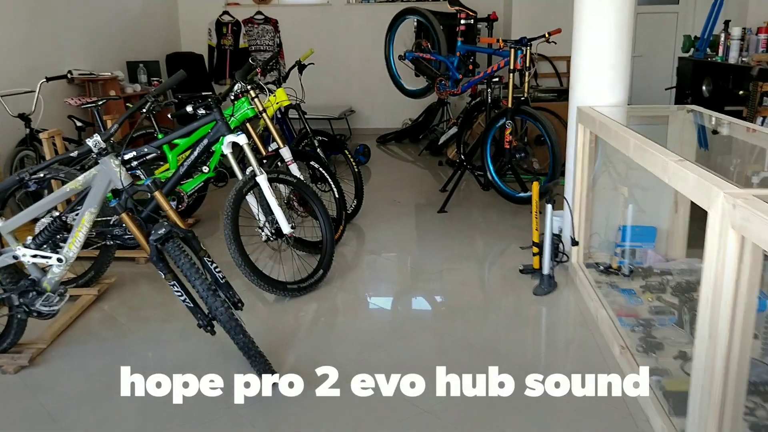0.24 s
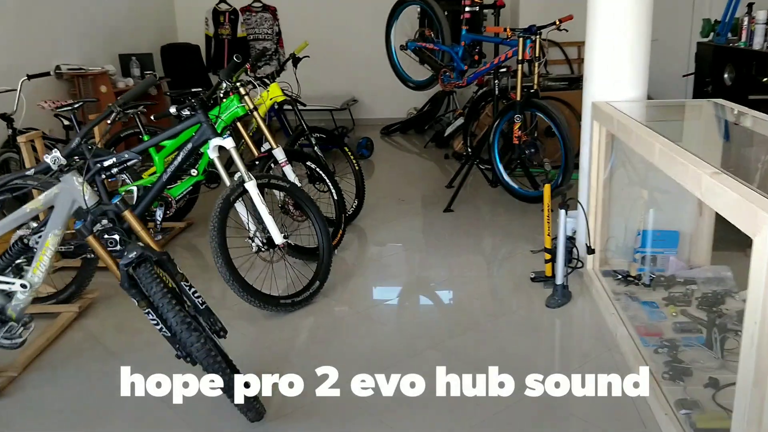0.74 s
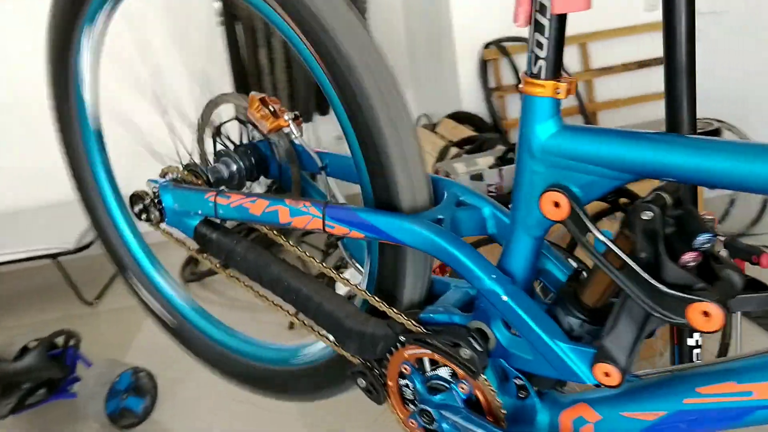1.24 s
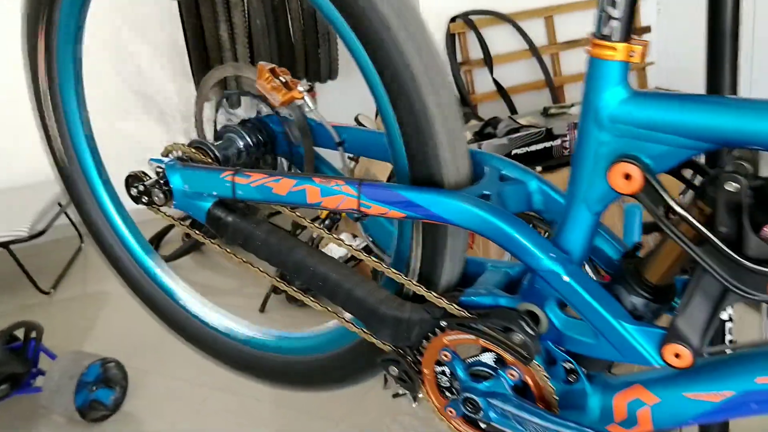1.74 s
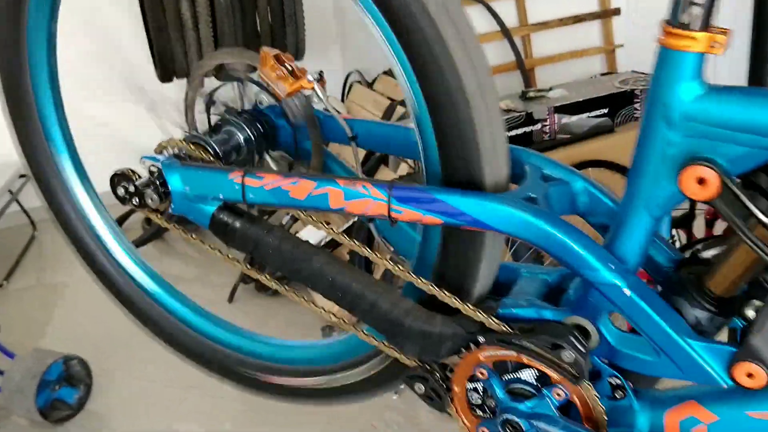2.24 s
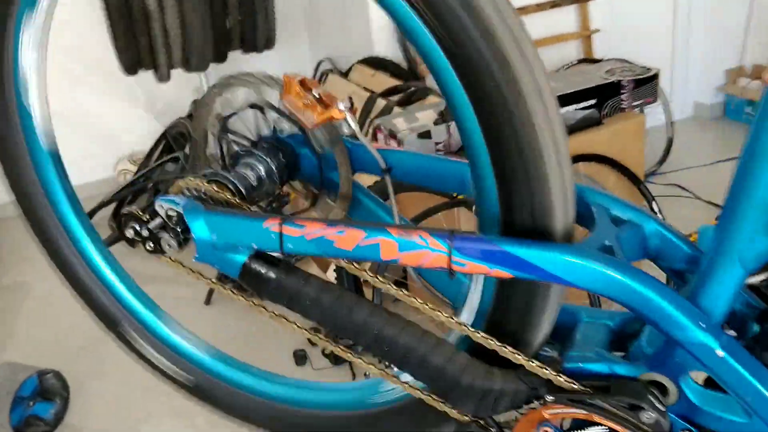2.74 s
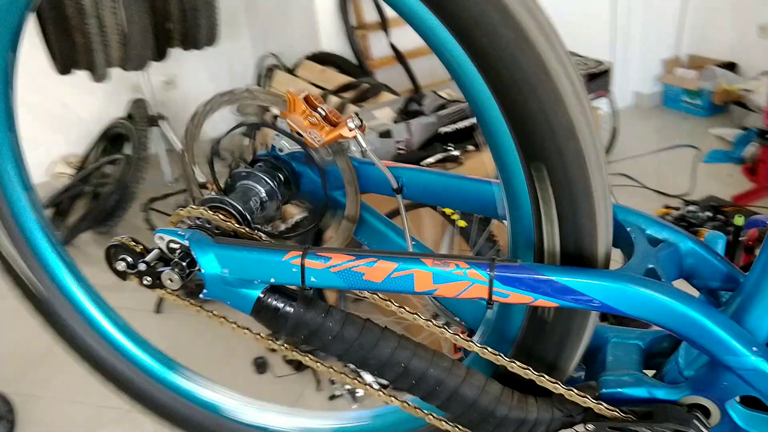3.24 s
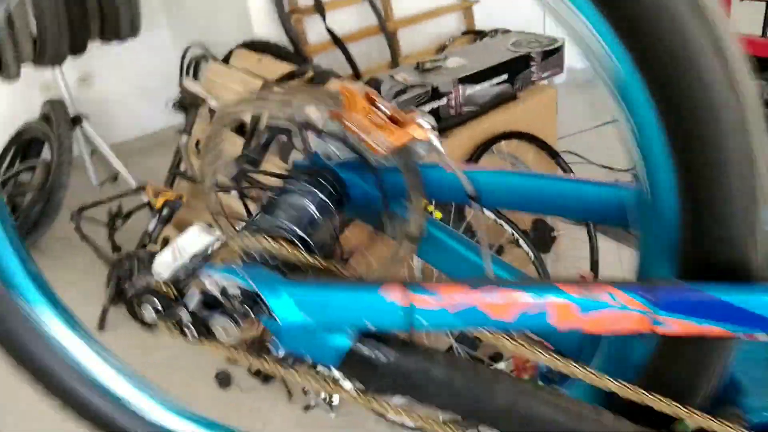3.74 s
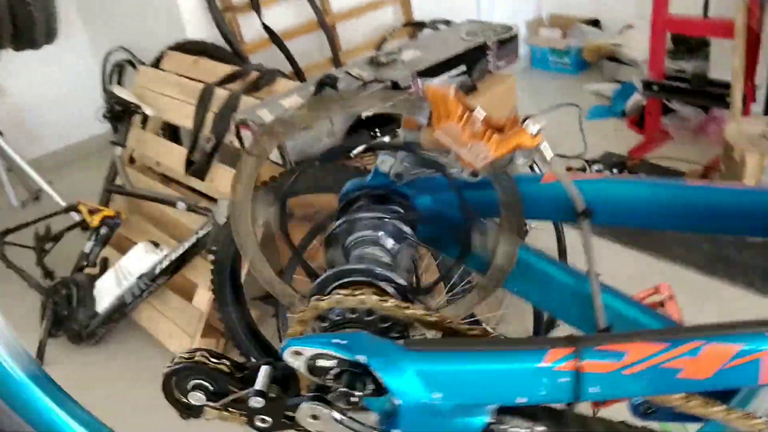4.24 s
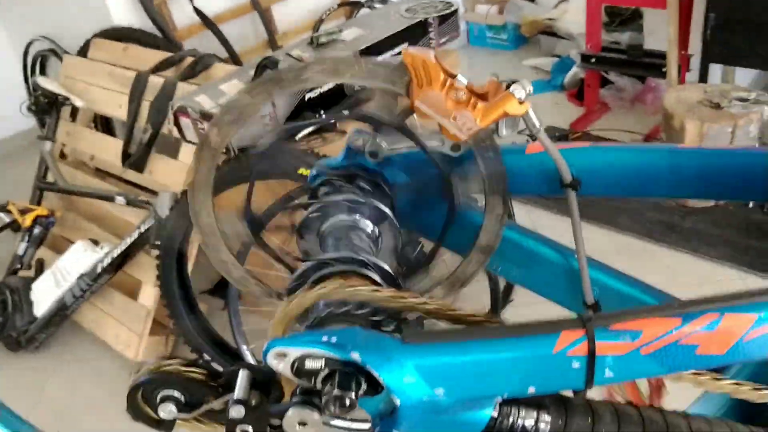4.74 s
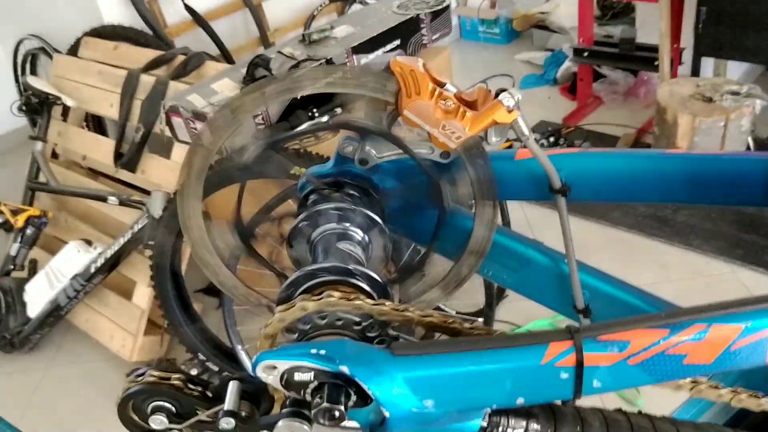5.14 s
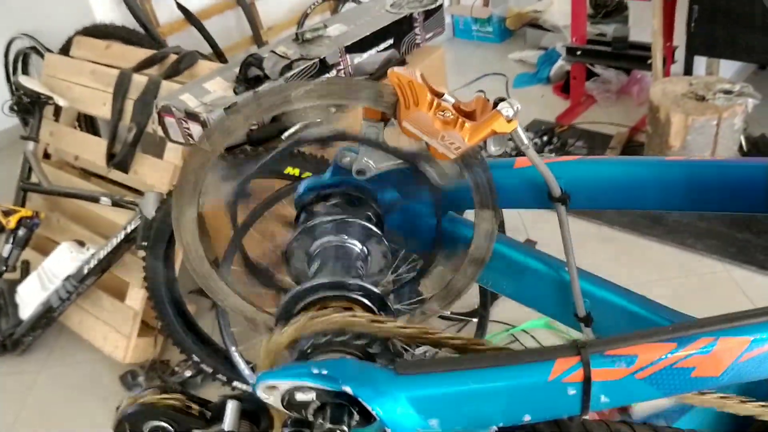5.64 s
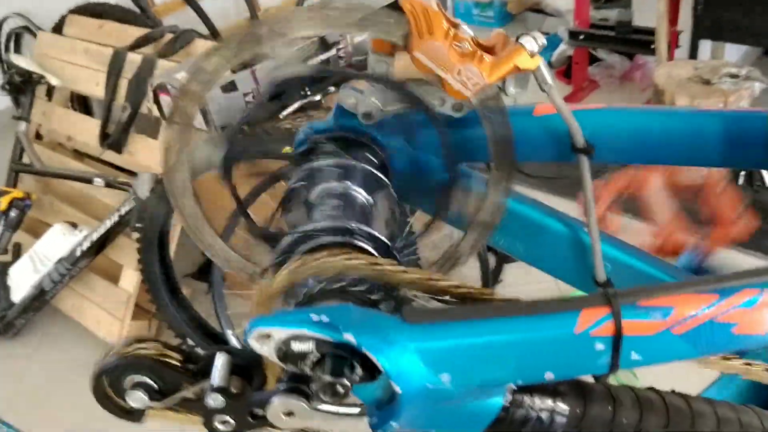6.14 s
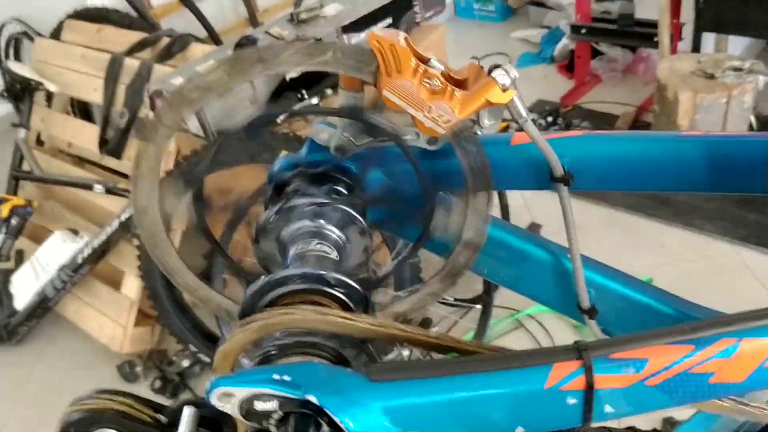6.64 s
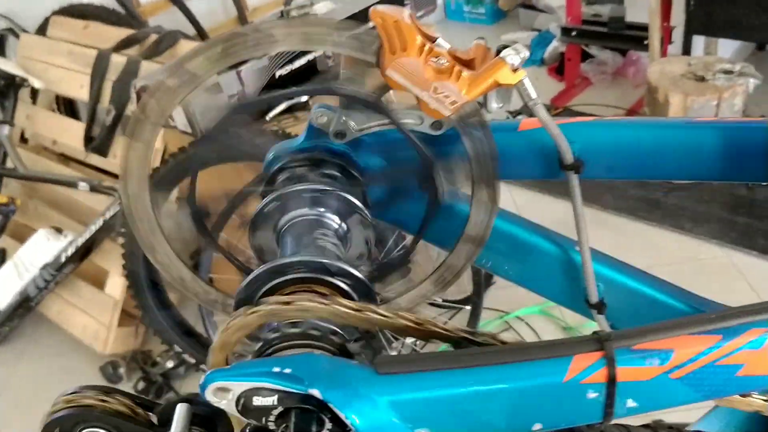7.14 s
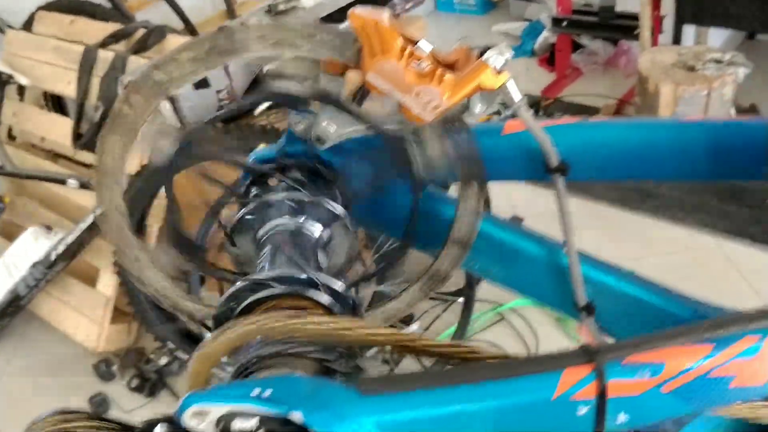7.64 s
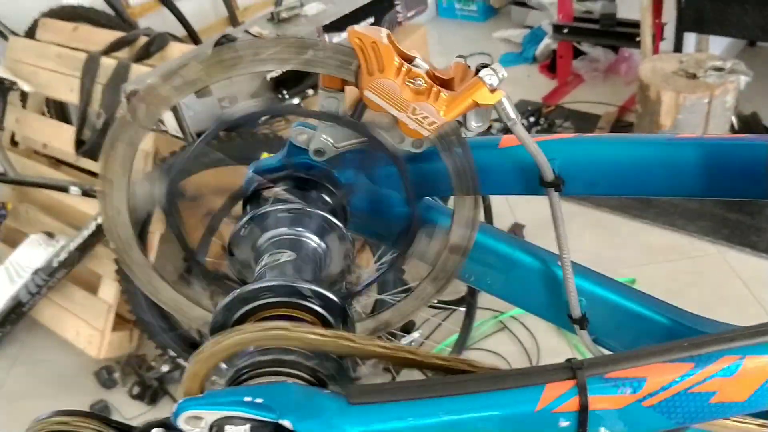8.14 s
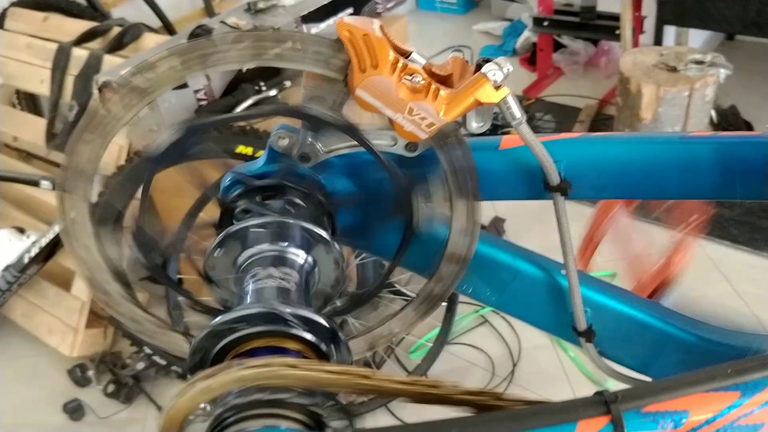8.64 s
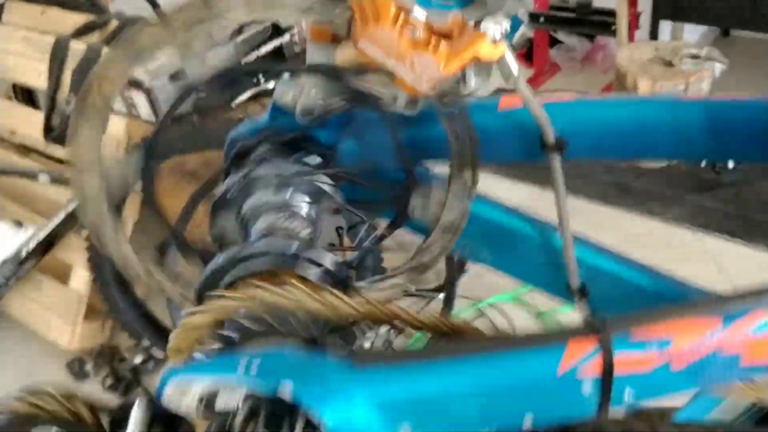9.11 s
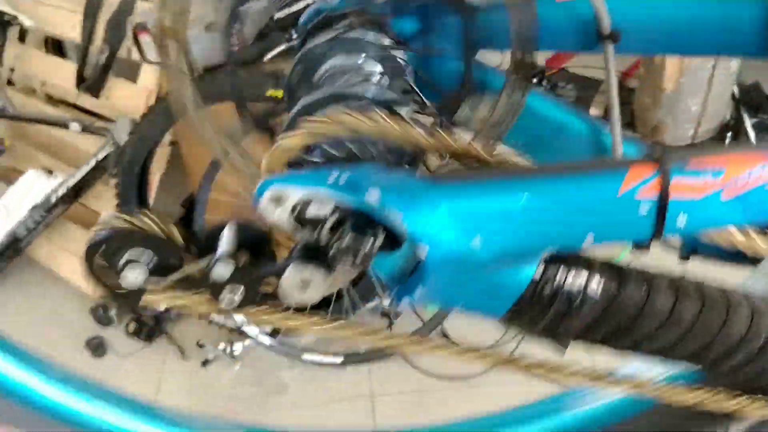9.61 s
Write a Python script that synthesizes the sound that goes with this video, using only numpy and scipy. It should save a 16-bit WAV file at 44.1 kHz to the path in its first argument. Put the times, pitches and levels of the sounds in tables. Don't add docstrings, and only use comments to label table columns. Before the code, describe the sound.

In a hard, tiled workshop, a spinning bicycle hub is first heard far off as a blurred, echoing buzz. After one second it cuts to a handheld microphone moving in on separate, crisp metal clicks. The ratchet speeds up briefly, slows and stops; light chain ticks fill the gap, then a bright, dense buzz surges unevenly to the end, with low handling bumps.

```python
import sys
import numpy as np
from scipy import signal
from scipy.fft import rfft, irfft, next_fast_len
from scipy.io import wavfile
from scipy.ndimage import uniform_filter1d

SR = 44100
rng = np.random.default_rng(int(sys.argv[2]) if len(sys.argv) > 2 else 0)


def invert_db(x):
    u = np.asarray(x, float) / 20
    return 10 ** u


def waveform_to_disk(signal):
    frames = np.transpose(np.atleast_2d(signal))
    scaled = np.clip(frames, -1, 1) * 32767
    samples = np.round(scaled).astype(np.int16)
    wavfile.write(sys.argv[1], SR, samples)


N = 435266

# start_s, level_db
FAR_LEVEL = [
    (0.0, -26),
    (0.124, -23),
    (0.422, -26),
    (0.98, -25),
]
FAR_TEETH_PER_S, FAR_DRY_DB, FAR_RING_DB, FAR_AIR_DB = 101, -6.5, -2.5, -8.5
CUT_S, FADE_IN_S = 1, 0.018
# start_s, buzz_db, closeness_db (brightness)
APPROACH = [
    [(1.05, -38, -12), (1.2, -35.5, -12.5), (1.4, -35.5, -10), (1.62, -39.5, -13.5), (1.85, -33, -7.5),
     (2.1, -34.5, -8.5), (2.35, -34.5, -8.5), (2.55, -35, -5.5), (2.72, -35.5, -5), (2.95, -37.0, -3),
     (3.25, -36, -5), (3.5, -36.5, -2), (3.72, -36, -5.5), (3.95, -39.5, -3), (4.25, -37.0, -0.5),
     (4.6, -36.5, -1), (4.95, -38, -2), (5.3, -37.5, -2.5)],
    [(6.24, -35.5, -5), (6.4, -36, -1), (6.6, -36.5, -1.5), (6.85, -36.0, -1), (7.05, -35.5, -2.5),
     (7.22, -37.5, -2.5), (7.5, -37.5, -0.5), (7.72, -35, 0), (7.95, -36, -1), (8.15, -38.5, -1),
     (8.4, -38, -2), (8.6, -38.5, -1.5), (8.82, -36.5, 0.5), (9.05, -37.0, -1), (9.3, -36, 0.5),
     (9.5, -35.5, -2.5), (9.63, -39, -1.5), (9.8, -38.5, -2.5)],
]
# pitch_hz, width_hz, level_db
SHELL = [(695, 780, -7.5), (1340, 790, -29), (2270, 170, -66), (3115, 11, -17), (2865, 640, -7),
         (4840, 1500, -88), (4870, 410, -10), (6100, 1250, -12.5), (7540, 400, -12.5), (8320, 2230, -4),
         (8470, 720, -2), (9160, 730, -5.5), (11010, 570, -7.5), (11930, 410, -8), (12680, 1100, 4),
         (14550, 170, -19), (13800, 550, 1.5), (14200, 430, -20.5)]
# pitch_hz, level_db, t60_s (three times the ring time used)
FRAME = [(770, -35, 0.076), (980, 19.5, 0.13), (1401.5, 24, 0.17), (1507, 14, 0.21), (1621, 4.5, 0.39),
         (1899, 10.5, 0.26), (2058, 18.5, 0.2), (2180, 26.5, 0.1), (2314, 24.5, 0.096), (2776, 7.5, 0.63),
         (3370, 14, 0.14), (7700, -17, 0.13), (7900, -5, 0.04), (9270, 9, .25)]
SWING_KNOTS = [-0.5, -0.93, -0.03, 1, 3, 4, 4.5, 5.5, 6, 5.5, 8.5, 8.5, 7.5, 15]
# beams_per_turn, swing_db, angle_turns
LOW_BEAM = [(1, 5, 0.1), (2, -1, 0.068), (3, 3.1, 0.018)]
HIGH_BEAM = [(1, 1.2, 0.036), (2, 3.1, -.02), (3, 0.15, 0.03)]
BEAM_SPLIT_HZ = 1750
# pitch_hz, t60_s
ROOM_T60 = [(500, 0.62), (2000, 0.33), (5000, 0.52), (9000, 0.45), (15000, 0.055)]
STANCE_S = 0.25
BENCH_ECHO_S, BENCH_ECHO_DB = 0.0052, -10.5
KNUCKLE_DB = -5
# pitch_hz, level_db
SHOP_COLOUR = [(40, -7), (180, -9.5), (300, -14.5), (1420, -8.5), (2520, -3.5), (2980, -15), (7140, -18),
               (8280, -13.5), (11700, -25), (15500, -20)]
SHOP_DB = -53.0
# start_s, teeth_per_s
COAST = [
    (1.012, 55.49),
    (3.3, 51.8),
    (4.38, 50.19),
    (4.56, 50.58),
    (4.82, 85.33),
    (4.94, 92.29),
    (5.14, 84.53),
    (5.26, 70.41),
    (5.5882, 7.78),
]
# start_s, teeth_per_s
BACKPEDAL = [(6.2029, 41.42), (6.25, 79.4), (6.41, 133.05), (6.55, 140.6), (6.89, 136.92), (7.11, 87.51),
             (7.21, 82.55), (7.37, 97.65), (7.51, 101.0), (7.75, 133.88), (7.89, 131.01), (8.25, 132.62),
             (8.47, 126.63), (8.69, 112.79), (8.99, 127.94), (9.33, 119.88), (9.45, 121.2),
             (9.8635, 110.38)]
# level_db at closeness 0, slope in dB per dB of closeness
BODY_LAW = (-10.5, -0.28)
AIR_LAW = (0.84, 1)
ROOM_LAW = (-4, -0.66)
JOLT_LAW = (-31.5, 0.98)
TURN_DB, TEETH_PER_TURN = 1, 40
RESTART_DRY_DB, RESTART_S = -7, 0.073
SLOW_TEETH_PER_S, SLOW_ROOM_DB, RESTART_HIT_DB = 59, -5, 5.5
# start_s, peak_db
CHAIN = [
    (5.7222, -43.5),
    (5.7688, -46),
    (5.817, -45),
    (5.8656, -49),
    (5.913, -42),
    (5.962, -41),
    (6.007, -46),
    (6.055, -43.5),
    (6.099, -43),
    (6.148, -42.5),
]
# start_s, level_db
JOLTS = [(6.204, -20), (6.3183, -14.5), (6.3719, -18), (6.3885, -22), (6.404, -14), (6.6372, -19),
         (6.708, -12), (6.7154, -10.5), (7.2645, -16), (7.4437, -10), (7.5134, -16), (7.7132, -13),
         (7.7586, -10.5), (7.774, -8), (8.1386, -4), (8.2285, 0), (8.3814, -6.5), (8.3893, -10.5),
         (8.4913, -3), (8.7715, -13.5), (8.912, -20), (9.0312, 0.5), (9.0707, -17.5), (9.2003, -18),
         (9.2808, -10.5), (9.3052, -15), (9.4552, -11), (9.572, -10), (9.7799, -15), (9.8068, -23)]
# start_s, level_db
REBOUNDS = [
    (8.1462, 3),
    (8.236, 4.5),
    (8.7632, -18),
    (9.0391, 4),
    (9.207, -19),
    (9.3307, -11),
]
# start_s, level_db
KNOCKS = [
    (1.509, -31),
    (1.708, -29),
    (2.095, -21),
    (3.047, -31),
    (3.152, -19),
    (3.2505, -21),
    (3.5519, -2),
    (4.241, -22),
    (4.384, -21),
    (4.634, -20),
]
# start_s, level_db
SHIFTS = [
    (2.06, -58),
    (3.24, -58.5),
    (6.12, -56.5),
    (7.08, -46.5),
    (7.64, -54),
    (8.3, -60),
    (9.26, -59),
]
GRIP_DB, FAR_GRIP_DB, LATE_GRIP_DB, SHIFT_S = -61.5, -51.5, 0.5, 0.1
LIGHTER_GRIP_S, LIGHTER_GRIP_DB = 3, -2
EARLY_JOLT_DB = 0.5
JOLT_PER_SPEED_DB = 5.5
# pitch_hz, phase_radians
PORT_PHASE = [(0, 0), (3850, 0), (4450, 3.2), (4900, 3.9), (9390, 16.2), (10600, 19.5), (16000, 25)]
# pitch_hz, level_db
PORT_BALANCE = [(60, 6), (160, -11), (270, 11), (450, -0.5), (740, 1), (1220, 3), (2010, 3), (3330, 1),
                (5500, 3.5), (9080, 8), (15000, -1.5)]
# pitch_hz, level_db
WIDENER = [(60, 17), (150, 12), (400, 3), (700, -5), (1200, -12), (1550, .1), (1900, 9), (2500, 11),
           (3000, .1), (3700, -12), (3980, -2), (4200, 6), (4700, 5), (5300, .1)]
# start_s, lead_db
MUTE_LEAD = [(0, 10), (1.5, 10.5), (5.5, 11.5), (5.7, 10.5), (6.14, 9.5), (6.16, 40), (6.22, 40),
             (6.25, 6.5), (6.4, 6), (6.9, 7), (7.1, 10), (7.6, 9), (7.8, 7), (9.8, 7)]
# pitch_hz, lean_db (towards muting the middle)
MUTE_LEAN = [(1100, 2), (2600, 1.5), (3500, -1.5), (4450, 3), (5900, -3), (10800, -1), (12000, 1.5),
             (13300, -5)]
MUTE_WANDER_DB, MUTE_FROM_HZ, LEAN_WIDTH_HZ = 3.6, 900, 450


def rms_one(x):
    return x / np.sqrt(np.mean(x ** 2) + 1e-20)


def in_time(rows, t):
    start_s, *columns = np.transpose(rows)
    return [np.interp(t, start_s, column) for column in columns]


def at_hz(points, hz):
    pitch_hz, value = np.transpose(points)
    return np.interp(np.log(hz + 1), np.log(pitch_hz + 1), value)


def train(t, heights):
    places = np.clip(np.round(t * SR).astype(int), 0, N - 1)
    return np.bincount(places, heights, N) + 1e-18


def strikes(rows):
    start_s, level_db = np.transpose(rows)
    return train(start_s, invert_db(level_db))


def ring(x, hz, t60):
    r = invert_db(-60 / (t60 * SR))
    w = 2 * np.pi * hz / SR
    return signal.lfilter([0, np.sin(w)], [1, -2 * r * np.cos(w), r * r], x)


def fading(clicks, t60):
    return signal.lfilter([1], [1, -invert_db(-60 / (t60 * SR))], clicks)


def butter(x, hz, kind, order):
    return signal.sosfilt(signal.butter(order, hz, kind, fs=SR, output="sos"), x)


def beam(t, lobes):
    turn = np.interp(t, SWING_KNOTS, np.arange(len(SWING_KNOTS)))
    return sum(db * np.cos(2 * np.pi * beams * (turn - angle)) for beams, db, angle in lobes)


def snaps(t, snap_db, body_db, air_db, rim_db):
    spread_s, burst_t60, colour_db, alike = 0.0015, 0.014, 2.5, 0.55
    count = len(t)
    drop = t[:, None] + spread_s * rng.random((count, 4)) * [0, 1, 1, 1]
    force_db = snap_db[:, None] + 1.8 * rng.standard_normal((count, 4)) - [0, 8, 10, 11]
    drop = np.hstack([drop, drop[:, :1] + BENCH_ECHO_S])
    force_db = np.hstack([force_db, force_db[:, :1] + BENCH_ECHO_DB])
    tint = rng.standard_normal((count, len(SHELL)))
    grit = rng.standard_normal((2, 3, N))
    out = 0
    for k, (hz, width, db) in enumerate(SHELL):
        air_share = (hz > 11000) * (1 if 12500 < hz < 13500 else 0.7)
        tint_db = db + colour_db * tint[:, k] + air_db * air_share
        tint_db = tint_db + body_db * (hz < 4000) + rim_db * (hz < BEAM_SPLIT_HZ)
        echo_db = [0, 0, 0, 0, 3 * (hz > 11000)]
        height = invert_db(force_db + tint_db[:, None] + echo_db)
        burst = fading(train(drop.ravel(), height.ravel()), burst_t60)
        t60 = np.log(1000) / np.pi / width
        out = out + ring(burst * grit[k % 2], hz, t60) * np.sqrt(width / SR)
    crack = fading(train(t, invert_db(force_db[:, 0] - 16.5)), 0.003)
    out = out + butter(crack * grit[0], 2500, "high", order=2)
    return np.sqrt(alike) * out[0] + np.sqrt(1 - alike) * out[1:]


def frame(t, ring_db, heard_s):
    strength = 1.4 + 0.55 * rng.standard_normal((len(t), len(FRAME)))
    low_db, high_db = beam(heard_s, LOW_BEAM), beam(heard_s, HIGH_BEAM)
    out = 0
    for k, (hz, db, t60) in enumerate(FRAME):
        swing_db = (high_db if hz > BEAM_SPLIT_HZ else low_db) * (hz < 2600)
        out = out + ring(train(t, invert_db(ring_db + db + swing_db) * strength[:, k]), hz, t60 / 3)
    return out


def room(x):
    hop, size = int(STANCE_S * SR), int(0.6 * SR)
    x = np.pad(x, [(0, 0), (hop, 2 * hop)])
    starts = [i for i in range(0, N + hop, hop) if np.abs(x[:, i:i + 2 * hop]).max() > 1e-7]
    t = np.arange(size) / SR
    white = rng.standard_normal((len(starts), 2, size))
    tail = 0
    for hz in 250 * 2 ** np.arange(0, 6, 0.5):
        t60 = at_hz(ROOM_T60, hz * 3.62)
        band = butter(white, [hz, hz * np.sqrt(2)], "band", order=1)
        tail = tail + band * invert_db(-60 * t / t60) / np.sqrt(t60)
    tail = tail * np.clip(t / 0.02, 0, 1)
    tail = tail / np.sqrt(np.sum(tail ** 2, axis=2, keepdims=True))
    out = np.zeros((2, N + 3 * hop + size))
    blend = np.sin(np.pi * np.arange(2 * hop) / (2 * hop))
    for i, paths in zip(starts, tail):
        piece = x[:, i:i + 2 * hop] * blend
        out[:, i:i + 2 * hop + size - 1] += signal.fftconvolve(piece, paths, axes=1)
    return out[:, hop:hop + N]


def hub(t, snap_db, room_db, body_db, air_db, early_s=0):
    heard_s = t - early_s
    strike_db = snap_db + body_db
    rim_db = beam(heard_s, LOW_BEAM)
    dry = snaps(t, snap_db, body_db, air_db, rim_db) + frame(t, strike_db - 41, heard_s)
    knuckle = train(t, invert_db(strike_db + KNUCKLE_DB + 0.55 * rim_db))
    dry = dry + butter(knuckle, [1300, 5500], "band", order=1) * [[1], [0.2]]
    dry = butter(dry, 1527, "high", order=12) + invert_db(-18) * butter(dry, 450, "high", order=2)
    near = np.clip((t - 2.4) / 0.5, 0, 1)
    for hz, share in ((819, 1 - near), (753, near)):
        dry = dry + ring(train(t, invert_db(strike_db - 32.5) * share), hz, 0.05)
    dry = dry + butter(train(t, invert_db(strike_db - 42)), [400, 1250], "band", order=2)
    return dry, room(dry * invert_db(np.interp(np.arange(N) / SR, t, room_db)))


def far_view():
    t = np.arange(0, 2, 1 / FAR_TEETH_PER_S)
    t = t + 0.0012 * rng.standard_normal(len(t))
    flat = np.zeros(len(t))
    dry, wet = hub(t, flat, flat, flat + FAR_RING_DB, flat + FAR_AIR_DB, early_s=0.98)
    heard = np.roll(invert_db(FAR_DRY_DB) * dry + wet, -SR, axis=1)
    time = np.arange(N) / SR
    level = invert_db(in_time(FAR_LEVEL, time)[0] + 1)
    return heard / np.std(heard[:, :SR]) * level * (time < CUT_S)


def shop():
    size = next_fast_len(N)
    colour = invert_db(at_hz(SHOP_COLOUR, np.arange(size // 2 + 1) * SR / size))
    air = irfft(rfft(rng.standard_normal((2, size))) * colour, size)[:, :N]
    return invert_db(SHOP_DB) * rms_one(air)


def handling():
    time = np.arange(N) / SR
    swells = sum(invert_db(db) * np.exp(-np.abs(time - s) / SHIFT_S) for s, db in SHIFTS)
    steady_db = np.where(time < CUT_S, FAR_GRIP_DB, GRIP_DB) + LIGHTER_GRIP_DB * (time > LIGHTER_GRIP_S)
    return invert_db(steady_db) + swells


def housing(pushes, turn=False):
    if turn:
        c = np.tan(np.pi / 4 - np.pi * 200 / SR)
        pushes = signal.lfilter([-c, 1], [1, -c], pushes)
    cut = butter(pushes, 90, "high", order=4)
    mid = invert_db(12.5) * butter(butter(cut, 276, "low", order=1), 2000, "low", order=1)
    mid = mid * (-1 if turn else 1)
    side = -invert_db(36) * butter(butter(cut, 26, "low", order=1), 600, "low", order=2)
    side = side + 0.008 * ring(side, 150, 0.025)
    return np.array([mid + side, mid - side])


def jolts(t, jolt_db):
    early_db = EARLY_JOLT_DB * (t < 5.8)
    small = train(t, invert_db(jolt_db + early_db + 2 * rng.standard_normal(len(t))))
    small = invert_db(35) * butter(small, 6, "low", order=1) + invert_db(-9) * small
    small = butter(small, 40, "high", order=1)
    grip = rng.standard_normal((2, N)) * handling() * invert_db(2)
    early = np.arange(N) < 5.8 * SR
    late_grip = invert_db(LATE_GRIP_DB) * grip[0] * ~early
    other = grip[1] * early - strikes(KNOCKS)
    pushes = small + strikes(JOLTS) - strikes(REBOUNDS) + late_grip
    return housing(pushes) + housing(other, turn=True)


def teeth_times(rows):
    t = np.arange(rows[0][0], rows[-1][0] + 0.02, 1 / SR)
    passed = np.cumsum(in_time(rows, t)[0]) / SR
    ends = np.interp(rows[-1][0], t, passed)
    return np.interp(np.arange(round(ends) + 1), passed, t)


def near_hub(t, speed, buzz_db, close):
    body_db, air_db, room_db = (base + slope * close for base, slope in (BODY_LAW, AIR_LAW, ROOM_LAW))
    since = t - BACKPEDAL[0][0]
    fresh_db = RESTART_DRY_DB * np.exp(-np.abs(since) / RESTART_S) * (since > -RESTART_S)
    snap_db = buzz_db - 10 * np.log10(np.maximum(speed, 42) / 60) + 14.5
    snap_db = snap_db + TURN_DB * np.sin(2 * np.pi * np.arange(len(t)) / TEETH_PER_TURN + 3.34)
    snap_db = snap_db + RESTART_HIT_DB * (np.abs(since) < 0.005)
    slow = np.clip(1 - speed / SLOW_TEETH_PER_S, 0, 1)
    snap_db = snap_db + 3 * np.clip(slow - 0.4, 0, 0.4) / 0.39
    room_db = room_db + SLOW_ROOM_DB * np.sqrt(slow)
    dry, wet = hub(t, snap_db, room_db + fresh_db, body_db + fresh_db + 4.5, air_db - 3.5)
    axle = ring(train(t, invert_db(snap_db - 14.5) * slow ** 2), 950, 0.015)
    return dry + axle + wet


def chain():
    burst = fading(strikes(CHAIN), 0.025) * rng.standard_normal((2, N))
    return invert_db(-5) * ring(burst, 8330, 0.0024) + invert_db(-30) * butter(burst, 2500, "high", order=2)


def widen(x):
    size = next_fast_len(N)
    left, right = rfft(x, size)
    wide = invert_db(at_hz(WIDENER, np.arange(size // 2 + 1) * SR / size))
    mid, side = (left + right) / 2, wide * (left - right) / 2
    return irfft(np.sqrt(2 / (1 + wide ** 2)) * [mid + side, mid - side], size)[:, :N]


def ports(x):
    size = next_fast_len(N)
    hz = np.arange(size // 2 + 1) * SR / size
    lean = invert_db(at_hz(PORT_BALANCE, hz) / 2)
    half = np.exp(0.5j * np.interp(hz, *np.transpose(PORT_PHASE)))
    turned = widen(irfft(rfft(x, size) * [half, 1 / half], size)[:, :N])
    return irfft(rfft(turned, size) * [lean, 1 / lean], size)[:, :N]


def scene():
    start_s, start_speed = COAST[0]
    before = start_s - np.arange(40, 0, -1) / start_speed
    t = np.concatenate([before, teeth_times(COAST), teeth_times(BACKPEDAL)])
    t = t + 0.00004 * rng.standard_normal(len(t))
    buzz_db, close = in_time(np.concatenate(APPROACH), t)
    speed = in_time(COAST + BACKPEDAL, t)[0]
    near = near_hub(t, speed, buzz_db, close) + chain()
    fade = np.clip((np.arange(N) / SR - CUT_S) / FADE_IN_S + 0.079, 0, 1) * (np.arange(N) >= CUT_S * SR)
    heard = ports(fade * near + far_view() + shop())
    jolt_db = JOLT_LAW[0] + JOLT_LAW[1] * close
    return heard + jolts(t, jolt_db + JOLT_PER_SPEED_DB * np.log2(np.maximum(speed, 42) / 100))


def joint_stereo(x):
    hop, lead = 1024, 2048 - 838
    frames = N // hop + 3
    padding = [(0, 0), (lead, (frames + 1) * hop - N - lead)]
    pair = np.pad([x[0] + x[1], x[0] - x[1]], padding) / 2
    n, k = np.arange(2 * hop), np.arange(hop)
    basis = np.cos(np.pi / hop * np.outer(n + 0.5 + hop / 2, k + 0.5)) * np.sqrt(2 / hop)
    basis = basis * signal.windows.kaiser_bessel_derived(2 * hop, 4 * np.pi)[:, None]
    halves = pair.reshape(2, -1, hop)
    z = np.concatenate([halves[:, :-1], halves[:, 1:]], axis=2) @ basis
    hz = (k + 0.5) * SR / 2 / hop
    power = uniform_filter1d(uniform_filter1d(z ** 2, size=9, axis=2), size=3, axis=1) + 1e-20
    wander = uniform_filter1d(rng.standard_normal((frames, hop // 16)), size=3, axis=0)
    wander = np.repeat(wander, hop // 64, axis=1)
    lean_db = sum(db * (np.abs(hz - centre) < LEAN_WIDTH_HZ) for centre, db in MUTE_LEAN)
    lean_db = uniform_filter1d(lean_db, size=9)
    lead_db = 10 * np.log10(power[1] / power[0]) + MUTE_WANDER_DB * rms_one(wander) + lean_db
    lead_db = lead_db * (hz > MUTE_FROM_HZ)
    need_db = in_time(MUTE_LEAD, (np.arange(frames) * hop + hop - lead) / SR)[0][:, None]
    back = (z * [lead_db < need_db, lead_db > -need_db]) @ basis.T
    joined = (back[:, :-1, hop:] + back[:, 1:, :hop]).reshape(2, -1)
    mid, side = joined[:, lead - hop:][:, :N]
    return np.array([mid + side, mid - side])


def low_pass(x):
    return signal.sosfilt(signal.butter(12, 16830, fs=SR, output="sos"), x)


def record(dry):
    dry = signal.sosfilt(signal.cheby2(16, 50, 16300, fs=SR, output="sos"), dry)
    return low_pass(joint_stereo(dry))


dry = scene()
out = record(dry)
waveform_to_disk(out)
```